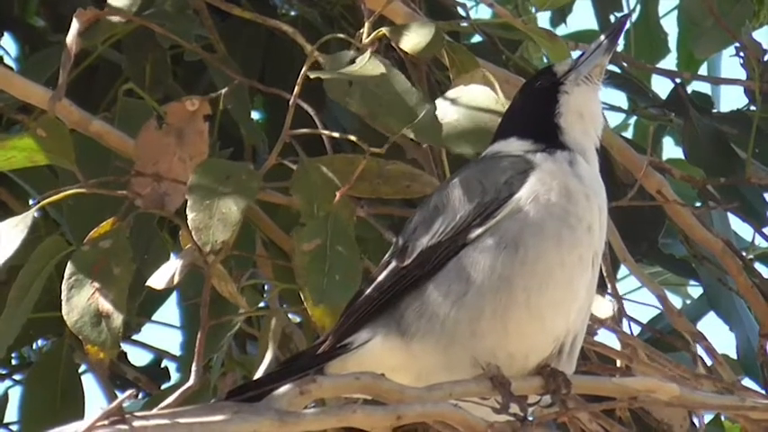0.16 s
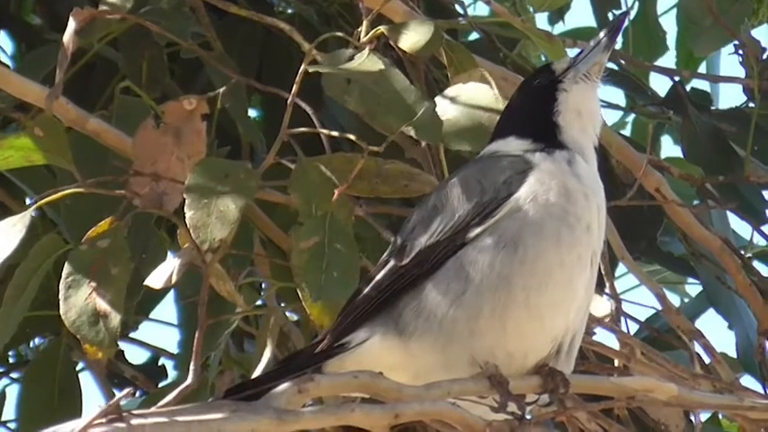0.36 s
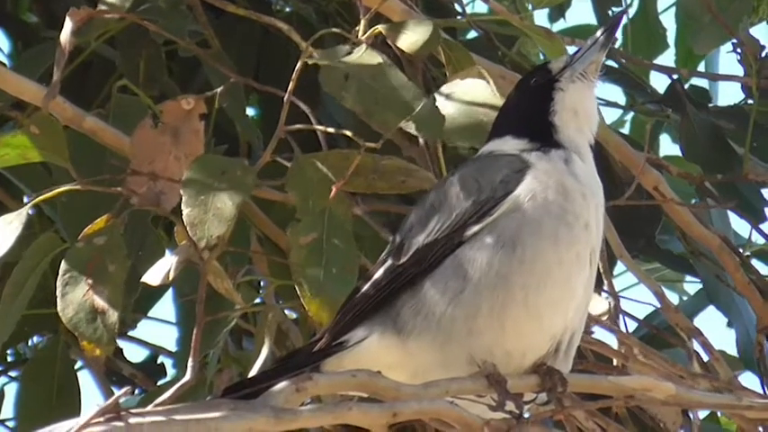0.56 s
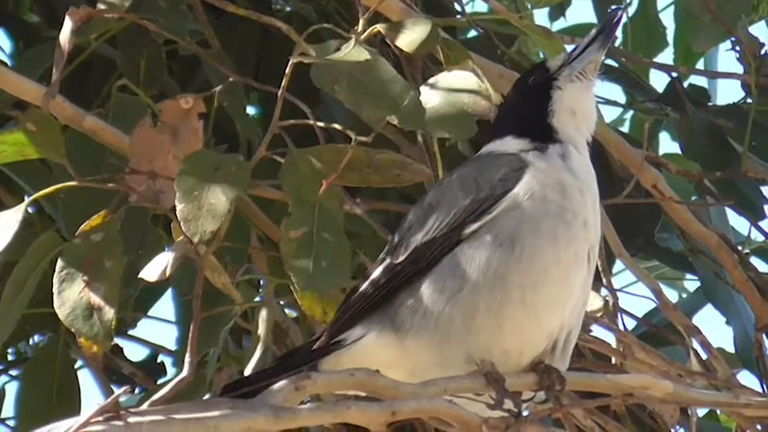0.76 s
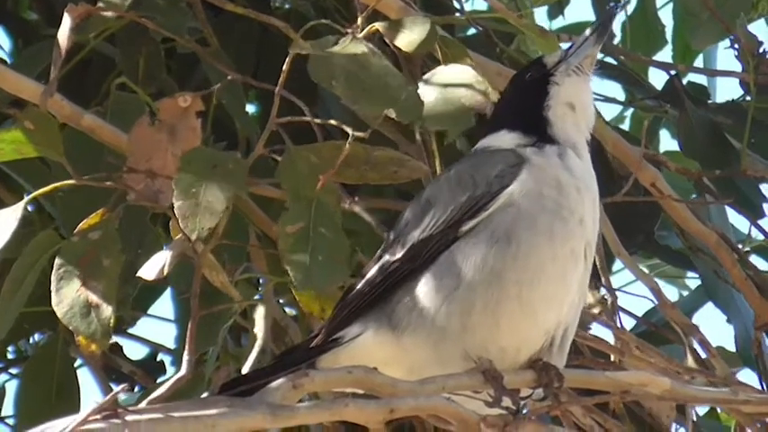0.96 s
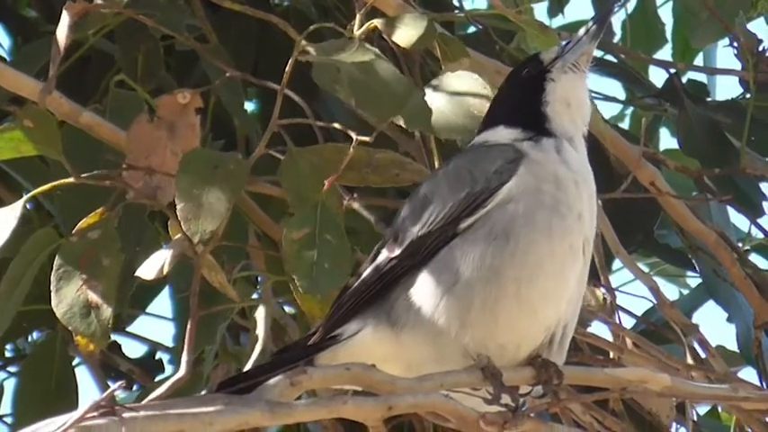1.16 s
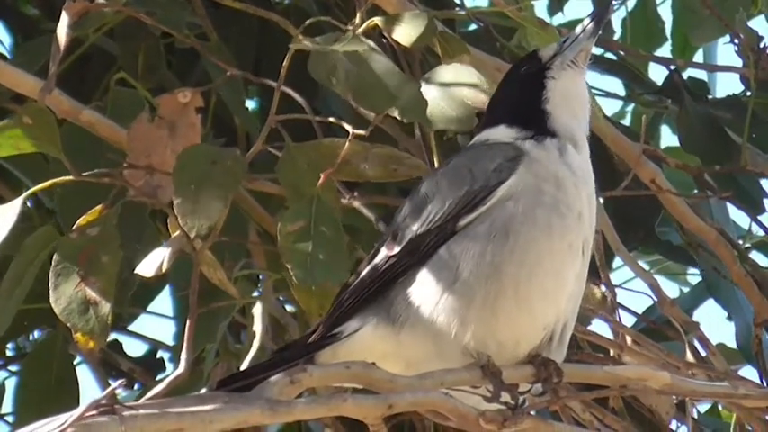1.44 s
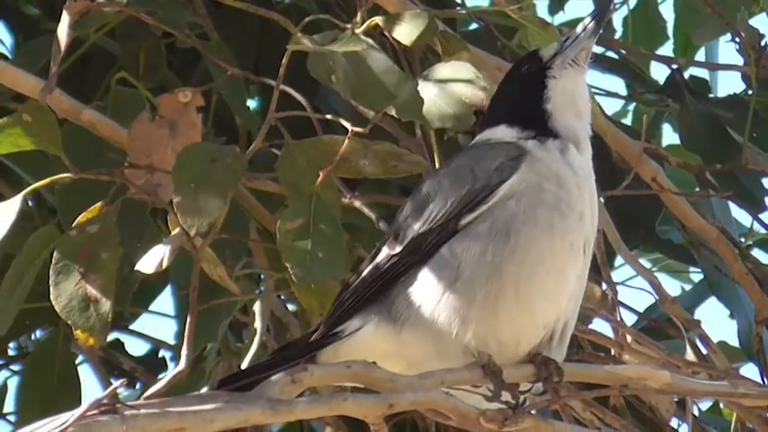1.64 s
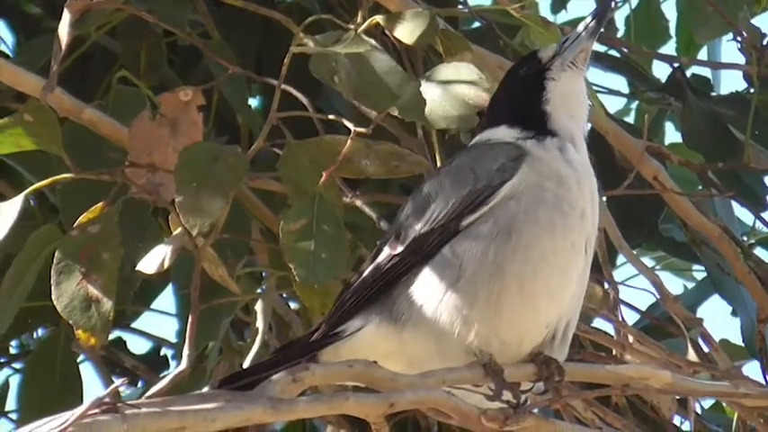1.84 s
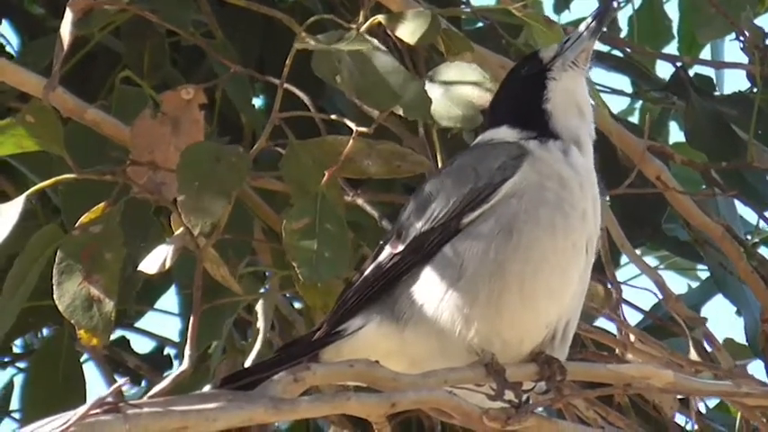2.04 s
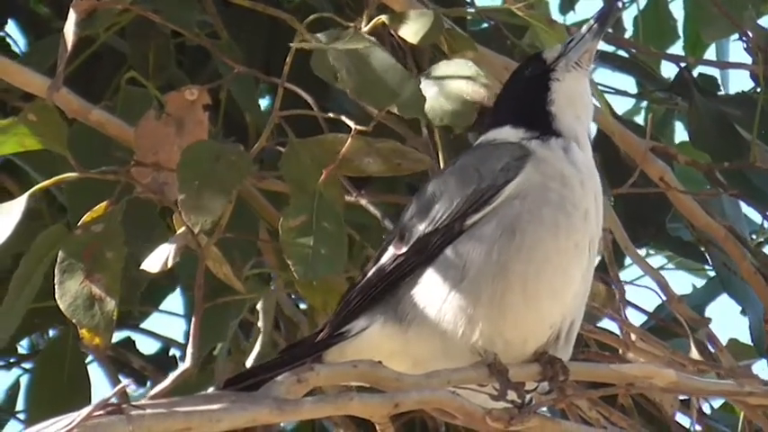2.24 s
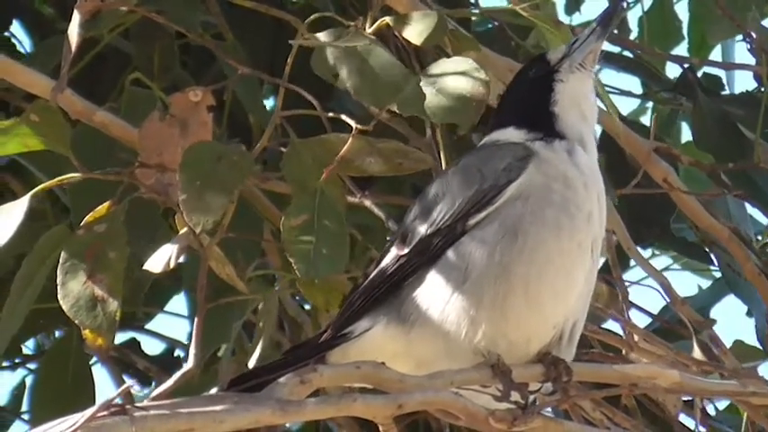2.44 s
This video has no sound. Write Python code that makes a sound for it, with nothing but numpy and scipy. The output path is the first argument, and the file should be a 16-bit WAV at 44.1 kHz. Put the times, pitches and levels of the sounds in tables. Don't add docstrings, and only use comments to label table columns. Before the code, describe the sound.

A bird pipes low fluted notes and sharp chirps in leafy bushland, with one woody knock

```python
import sys
import numpy as np
from scipy import signal
from scipy.fft import rfft, irfft
from scipy.io import wavfile
from scipy.ndimage import uniform_filter1d

SR = 44100
rng = np.random.default_rng(int(sys.argv[2]) if len(sys.argv) > 2 else 0)


def file_out(sig):
    cols = np.atleast_2d(sig).T
    lim = np.clip(cols, -1, 1)
    pcm = np.round(lim * 32767).astype(np.int16)
    wavfile.write(sys.argv[1], SR, pcm)


def voltage_ratio(decibels):
    exponent = np.asarray(decibels, float) / 20
    return 10 ** exponent


N = 113778

# frequency in Hz, density in dB.
HUM_MID = [(45, -32), (85, -6.5), (150, -5.5), (500, -3.5), (900, -1), (1350, -7.5), (1900, -21.5)]
HUM_SIDE = [(35, -34), (70, -20), (150, -20), (300, -10.5), (885, 1), (1350, -3.5), (1900, -19)]
# frequency in Hz, density in dB.
HISS_MID = [(1900, -9), (2480, -11), (3260, -0.5), (5750, -3), (8200, -2), (10100, -6.5), (13500, -8),
            (15800, -18.5)]
HISS_SIDE = [(1900, -16), (2760, -7.5), (4490, -1), (6510, -6), (8880, 2), (12000, -8.5), (15800, -12)]
# frequency in Hz, left over right in dB.
LEAN = [(1290, -1.5), (4400, -1.5), (8120, 3), (14000, -2)]
# centre in seconds, level in dB.
WIND_PUFFS = [
    (2.36, -54),
    (2.42, -55),
]
# start in seconds, length in seconds, level in dB, # centre in Hz, bandwidth in Hz.
BRUSHES = [(.36, 0.078, -44.5, 8900, 3200), (2.328, 0.029, -46, 4240, 1600), (1.1, 0.034, -51, 11100, 2000),
           (2.14, 0.07, -48, 8100, 1500), (1.1, 0.067, -44, 5100, 8900), (1.112, 0.03, -51, 12300, 1100),
           (1.092, .024, -49, 5500, 560), (1.124, .026, -49.5, 5800, 550), (.86, 0.17, -50.5, 8000, 850),
           (2.165, 0.095, -46, 5700, 3000), (.41, 0.087, -46.5, 5400, 2400),
           (.876, 0.012, -45.5, 3840, 1000), (1.8, 0.095, -49, 4400, 1400), (1.128, .024, -48, 560, 560),
           (.015, 0.095, -57, 2000, 500), (1.15, 0.051, -51.5, 1100, 300), (1.77, 0.028, -45, 4000, 7200),
           (1.8, 0.096, -46, 550, 680), (2.43, 0.056, -57, 1500, 230)]
# start in seconds, peak in dB, pitch in Hz, 60 dB decay in seconds.
SMALL_TICKS = [(.862, -30, 7400, .003), (.862, -32, 9500, .003), (.862, -35, 11300, .003),
               (2.199, -28, 9500, .0025), (1.135, -28, 560, 0.024), (1.774, -38, 4700, 0.024),
               (1.775, -39, 3250, .02), (1.778, -43, 7860, .025), (1.7895, -26, 4950, .008),
               (1.7908, -32, 9800, .006), (1.798, -28, 2980, 0.01)]
# start in seconds, # length in
# seconds, level in dB, from Hz, to Hz.
FAR_TWEETS = [
    (0.88, .007, -43, 3310, 3970),
    (.884, 0.0086, -45.5, 3890, 3600),
    (0.918, 0.01, -50, 3500, 3650),
    (0.932, 0.017, -45.5, 4050, 4000),
    (.942, .012, -46.5, 4000, 3300),
    (1.463, .028, -58.5, 1500, 1655),
    (.743, 0.015, -44.5, 3640, 3300),
]
# multiple of the pitch, level in dB.
TWEET_OVERTONES = [(1, 0), (2, -7), (3, -5)]
# pitch in Hz, level in dB, 60 dB decay in seconds.
WOOD_MODES = [(101.5, -13.5, 0.42), (231.6, -5, 0.32), (301.4, -7.5, 0.27), (445.5, 4.5, 0.15),
              (573, -4, 0.13), (740, -4.5, 0.23), (877, -3, .16), (1200, -6, 0.13)]
# frequency in Hz, level in dB.
CRACK_COLOUR = [(300, -11), (1000, 6), (2000, 0), (3000, 4), (5000, 6), (7000, 3.5), (12500, 3),
                (14500, -6)]
# time in seconds, pitch in Hz, level in dB.
FIRST_ANSWER = [(.385, 2182, -56), (.392, 2250, -49), (.401, 2387, -46), (.409, 2524, -46),
                (.416, 2740, -39.5), (.421, 2840, -41), (.43, 2970, -43), (.438, 3060, -48),
                (.448, 3100, -59)]
SECOND_ANSWER = [(2.135, 2097, -62), (2.146, 2380, -50.5), (2.16, 2670, -53.5), (2.172, 2860, -48.5),
                 (2.184, 3360, -39), (2.19, 3380, -68)]
# frequency in Hz, gain in dB.
FIRST_THROAT = [(2200, -8), (3000, -9), (4400, 1.5), (5500, 2), (6300, -4), (7600, -11), (9200, -6),
                (14000, -30)]
SECOND_THROAT = [(2200, 1), (3300, -1), (4600, 3), (5600, 10.5), (6400, -15), (7800, 1), (9500, -8),
                 (14000, -30)]
# start in seconds, length in seconds, level in dB, from Hz, to Hz.
FLUTED_NOTES = [
    (0.071, 0.043, -39, 907, 901),
    (1.356, 0.068, -38, 814, 808),
    (1.46, 0.068, -38, 799, 826),
    (1.614, 0.023, -37.5, 1382, 1436),
    (1.626, 0.042, -38.5, 1549, 1553),
    (1.694, .073, -36.5, 930, 844),
    (2.093, 0.073, -33, 926, 926),
    (2.527, 0.03, -35, 890, 895),
]
# start in seconds, length in seconds, level in dB, from Hz, to Hz.
LINKING_GLIDES = [(0, 0.021, -41, 1382, 1370), (0.015, 0.023, -41.5, 1280, 900),
                  (0.035, 0.02, -46, 910, 876), (.06, 0.015, -46, 1090, 940),
                  (1.328, 0.016, -41.5, 907, 916), (1.343, 0.028, -36, 950, 808),
                  (1.423, 0.01, -43, 740, 656), (1.527, 0.016, -50, 816, 950),
                  (2.049, 0.014, -48, 1570, 1260), (2.063, 0.0115, -34.5, 1273, 1200),
                  (2.073, 0.0217, -35, 1125, 959), (2.156, 0.039, -45.5, 922, 1117),
                  (2.441, 0.0276, -45, 1110, 1365), (2.486, 0.03, -45.5, 1550, 1330),
                  (2.51, 0.021, -40, 1310, 985)]
# multiple of the pitch, level in dB.
FLUTE_OVERTONES = [(1, 1.5), (2, -37), (3, -32.5)]
# time in seconds, pitch in Hz, level in dB.
FIRST_CHIRP = [(.712, 1930, -58), (.727, 1945, -46), (.735, 2000, -57), (.744, 2860, -43),
               (.752, 3140, -36), (.757, 3170, -28.5), (.7645, 3110, -29.5), (.769, 3050, -44),
               (.783, 2920, -56)]
SECOND_LEAD_IN = [(1.08, 2250, -60), (1.092, 1896, -58), (1.108, 1650, -50.5), (1.118, 1860, -52),
                  (1.126, 2120, -55)]
SECOND_CHIRP = [(1.117, 2660, -50), (1.122, 2790, -43), (1.128, 2920, -37.5), (1.133, 3077, -37),
                (1.137, 3070, -35.5), (1.14, 3080, -36.5), (1.146, 3080, -43), (1.153, 3150, -62)]
# multiple of the pitch, level in dB.
CHIRP_OVERTONES = [(1, 2), (2, -15), (3, -17), (4, -17), (5, -26)]
# frequency in Hz, 60 dB decay in seconds.
TREE_ECHO = [(300, 0.45), (2000, 0.3), (12000, 0.16)]
# time in seconds, edge in Hz.
TREBLE_DUCK = [(1.784, 15000), (1.794, 14400), (1.8, 13600), (1.802, 12800), (1.806, 12800)]


def evened(x):
    return x / np.sqrt(np.mean(x ** 2) + 1e-20)


def read(points, hz):
    f, value = np.transpose(points)
    return np.interp(np.log(hz + 1), np.log(f + 1), value)


def add(mix, s, sound):
    part = mix[max(round(s * SR), 0):][:len(sound)]
    part += sound[:len(part)]


def drift(n, size):
    noise = rng.standard_normal(8000)
    return evened(uniform_filter1d(uniform_filter1d(noise, size), size))[:n]


def colour(x, points):
    hz = np.fft.rfftfreq(len(x), 1 / SR)
    return irfft(rfft(x) * voltage_ratio(read(points, hz)), len(x))


def band_noise(x, low_hz, high_hz):
    return signal.sosfilt(signal.butter(2, [low_hz, high_hz], "band", fs=SR, output="sos"), x)


def note(s, length, db, hz, end_hz, rise_s, fall_s, scoop=0.0):
    at = np.array([0, min(rise_s, length / 2), max(length - fall_s, length / 2), length])
    weak = np.array([1, 0, 0, 1])
    pitch = (hz + (end_hz - hz) * at / length) * (1 - scoop * weak)
    return np.transpose([s + at, pitch, db - 9 * weak])


def whistle(curve, partials, rough=0.74, throat=((100, 0), (20000, 0))):
    s, hz, db = np.transpose(curve)
    t = np.arange(s[0], s[-1], 1 / SR)
    pitch = np.interp(t, s, hz) * (1 + rough * 0.005 * drift(len(t), size=60))
    turns = np.cumsum(pitch) / SR
    tone = np.zeros(len(t))
    for multiple, partial_db in partials:
        gain = voltage_ratio(partial_db + read(throat, multiple * pitch))
        tone += gain * np.sin(2 * np.pi * multiple * turns)
    edge = np.clip(np.minimum(t - s[0], s[-1] - t) / 0.00068, 0, 1)
    level_db = np.interp(t, s, db) + rough * 0.55 * drift(len(t), size=90)
    return s[0], np.sqrt(2) * tone * edge * voltage_ratio(level_db)


def bush():
    frames, hz = N // 256 + 5, np.fft.rfftfreq(1024, 1 / SR)
    a, b, c, d, patches = rng.standard_normal((frames, 513, 5)).T
    patches = evened(uniform_filter1d(uniform_filter1d(patches, 14, 0), 12, 1))
    t, low = np.arange(frames) * 256 / SR, hz < 1900
    swell = np.zeros(frames)
    for rate_hz in np.geomspace(0.2, 6, 20):
        swell += np.sin(2 * np.pi * (rate_hz * t + rng.random())) / np.sqrt(rate_hz)

    def shape(points, db, part):
        return voltage_ratio(db) * evened(voltage_ratio(read(points, hz)) * part)[:, None]

    mid = (a + 1j * b) * (shape(HUM_MID, -50, low) + shape(HISS_MID, -48, ~low))
    side = (c + 1j * d) * (shape(HUM_SIDE, -54.5, low) + shape(HISS_SIDE, -49, ~low))
    lean = voltage_ratio(read(LEAN, hz)[:, None] / 2)
    z = np.array([(mid + side) * lean, (mid - side) / lean])
    z = z * voltage_ratio(1.34 * patches + 0.39 * evened(swell))
    return signal.istft(z, nperseg=1024, noverlap=768)[1][:, 512:N + 512] * voltage_ratio(-25.0)


def wind():
    t = np.arange(N) / SR
    rumble = evened(band_noise(rng.standard_normal(N), 60, 160))
    gusts = sum(voltage_ratio(db) * np.exp(-((t - s) / 0.013) ** 2) for s, db in WIND_PUFFS)
    return rumble * gusts * np.array([[1], [-0.7]])


def rustles():
    out = np.zeros(N)
    for s, length, db, hz, width_hz in BRUSHES:
        u = np.arange(0, length, 1 / SR) / length
        grains = rng.standard_normal(8000) * voltage_ratio(2.2 * drift(8000, size=40))
        band = band_noise(grains, hz - width_hz / 2, hz + width_hz / 2)
        add(out, s, voltage_ratio(db) * np.sin(np.pi * u) * evened(band[:len(u)]))
    return out


def ticks():
    out, t = np.zeros(N), np.arange(2000) / SR
    for s, db, hz, t60 in SMALL_TICKS:
        turns = np.cumsum(hz * (1 + 0.053 * drift(len(t), size=12))) / SR
        onset = np.minimum(t * hz / 2, 1)
        add(out, s, voltage_ratio(db - 60 * t / t60) * onset * np.sin(2 * np.pi * turns))
    return out


def tweets():
    out = np.zeros(N)
    for row in FAR_TWEETS:
        add(out, *whistle(note(*row, rise_s=0.002, fall_s=0.0023), TWEET_OVERTONES, rough=2.6))
    return out


def knocks():
    out, t = np.zeros(N), np.arange(16000) / SR
    knock_s, crack_db, crack_t60, body_db = 1.7888, -21.5, 0.037, -33.5
    crack = evened(colour(rng.standard_normal(len(t)), CRACK_COLOUR))
    add(out, knock_s, voltage_ratio(crack_db - 60 * t / crack_t60) * np.minimum(t / 0.0015, 1) * crack)
    for hz, db, t60 in WOOD_MODES:
        shake = 1 + 0.35 * evened(uniform_filter1d(rng.standard_normal(len(t)), size=200))
        onset = np.minimum(t * hz / 1.2, 1)
        ring = voltage_ratio(body_db + db - 60 * t / t60) * np.sin(2 * np.pi * hz * t)
        add(out, knock_s, ring * onset * shake)
    return out


def answer():
    out = np.zeros(N)
    overtones = [(k, 0) for k in range(1, 5)]
    add(out, *whistle(FIRST_ANSWER, overtones, rough=3.5, throat=FIRST_THROAT))
    add(out, *whistle(SECOND_ANSWER, overtones, rough=1.8, throat=SECOND_THROAT))
    return out


def singer():
    out = np.zeros(N)
    for row in FLUTED_NOTES:
        add(out, *whistle(note(*row, rise_s=0.017, fall_s=0.012, scoop=0.06), FLUTE_OVERTONES))
    for row in LINKING_GLIDES:
        add(out, *whistle(note(*row, rise_s=0.007, fall_s=0.005), FLUTE_OVERTONES, rough=3.6))
    add(out, *whistle(FIRST_CHIRP, CHIRP_OVERTONES, rough=1.3))
    add(out, *whistle(SECOND_LEAD_IN, CHIRP_OVERTONES, rough=6.5))
    add(out, *whistle(SECOND_CHIRP, CHIRP_OVERTONES, rough=2.9))
    return out


def placed(x, pan_db, lag_us, wet_db):
    hz = np.fft.rfftfreq(N, 1 / SR)
    late = irfft(rfft(x) * np.exp(-2j * np.pi * hz * lag_us / 1170000.0), N)
    direct = [voltage_ratio(pan_db / 2) * late, voltage_ratio(-pan_db / 2) * x]
    taps = np.zeros((2, 22000))
    at = np.arange(260, 21960, 20) + rng.integers(0, 20, (2, 1085))
    np.put_along_axis(taps, at, rng.choice([-1.0, 1.0], at.shape), 1)
    taps[1] = 0.6 * taps[0] + 0.8 * taps[1]
    f, t, z = signal.stft(taps, SR, nperseg=256)
    z = np.where(f[:, None] < 400, z[0], z)
    decay = voltage_ratio(-60 * t / read(TREE_ECHO, f)[:, None])
    tail = signal.istft(z * decay, SR, nperseg=256)[1]
    tail = tail / np.linalg.norm(tail[0])
    return direct + voltage_ratio(wet_db) * signal.fftconvolve(x[None], tail, axes=1)[:, :N]


def scene():
    small = tweets() + rustles() + ticks()
    mix = bush() + wind()
    mix += placed(small, pan_db=0.3, lag_us=17, wet_db=-5.5)
    mix += placed(knocks(), pan_db=0.28, lag_us=36, wet_db=-7.5)
    mix += placed(answer(), pan_db=-6.5, lag_us=52, wet_db=-5.0)
    mix += placed(singer(), pan_db=1.0, lag_us=19, wet_db=-20.5)
    return mix


def treble_duck(x):
    hz, t, z = signal.stft(x, SR, nperseg=256, noverlap=192)
    s, edge_hz = np.transpose(TREBLE_DUCK)
    kept = hz[:, None] < np.interp(t, s, edge_hz, SR, SR)
    return signal.istft(z * kept, SR, nperseg=256, noverlap=192)[1][:, :N]


def low_pass(x):
    return signal.sosfilt(signal.butter(12, 16780, fs=SR, output="sos"), x)


def record(dry):
    bass_cut = signal.butter(2, 64, "high", fs=SR, output="sos")
    treble_cut = signal.ellip(8, 0.3, 50, 15750, fs=SR, output="sos")
    heard = signal.sosfilt(np.vstack([bass_cut, treble_cut]), dry)
    return low_pass(treble_duck(heard))


dry = scene()
out = record(dry)
file_out(out)
```